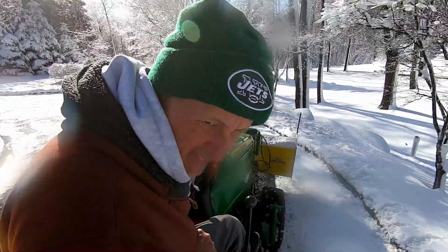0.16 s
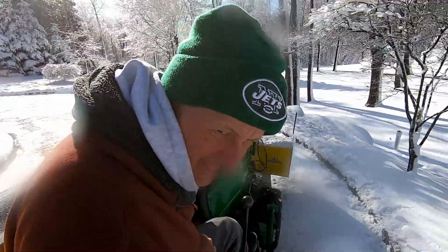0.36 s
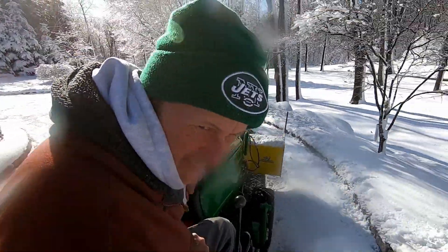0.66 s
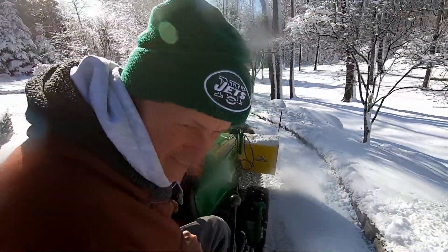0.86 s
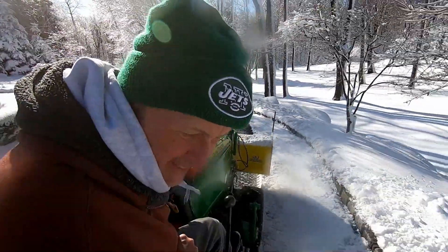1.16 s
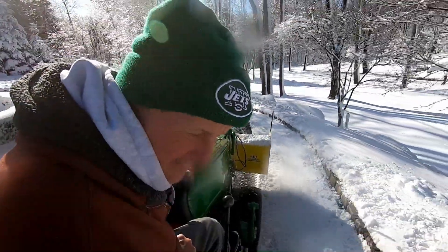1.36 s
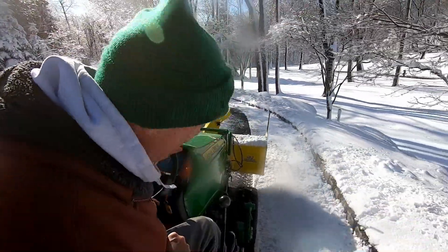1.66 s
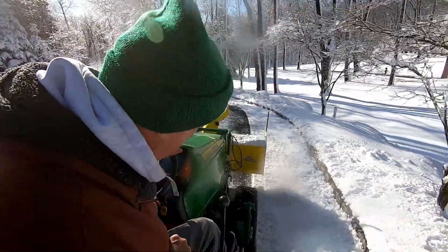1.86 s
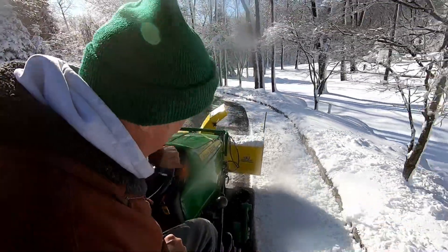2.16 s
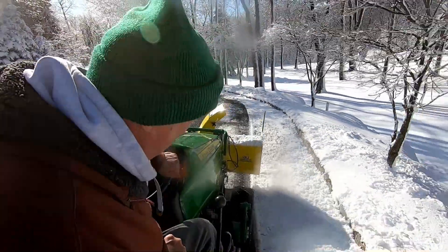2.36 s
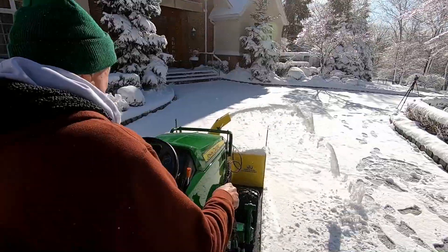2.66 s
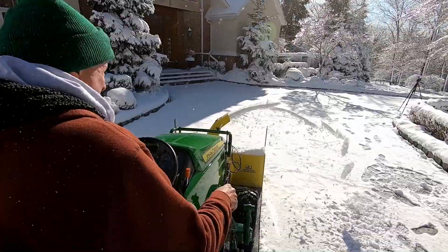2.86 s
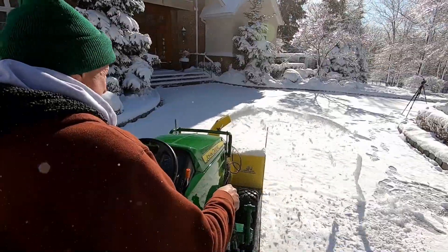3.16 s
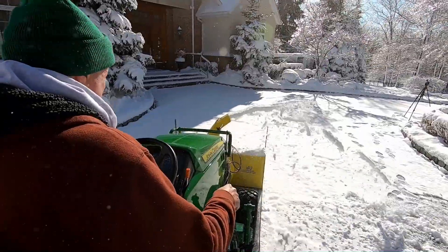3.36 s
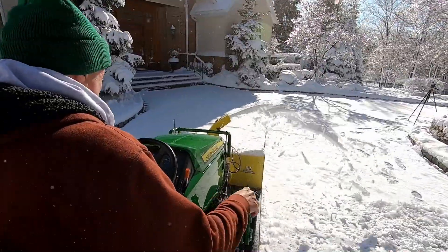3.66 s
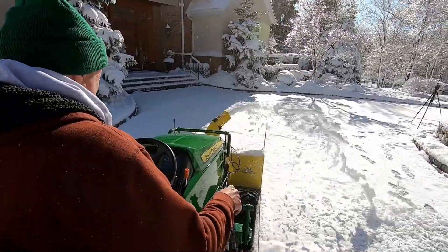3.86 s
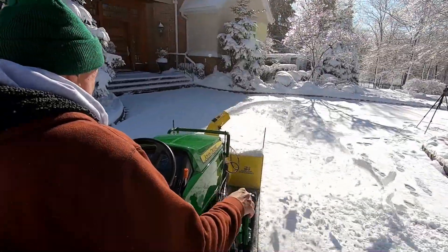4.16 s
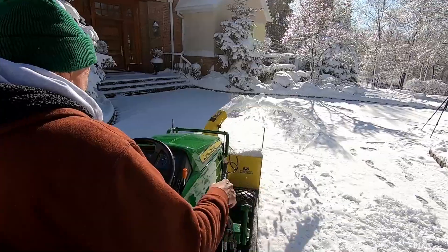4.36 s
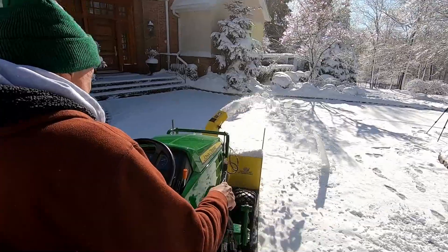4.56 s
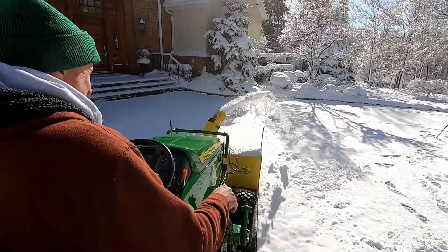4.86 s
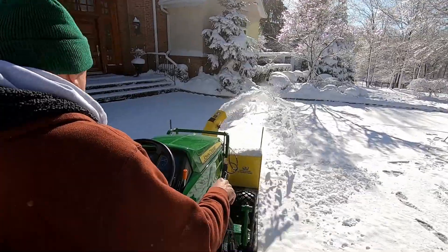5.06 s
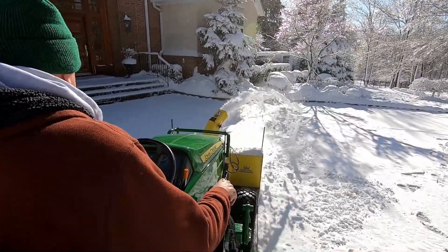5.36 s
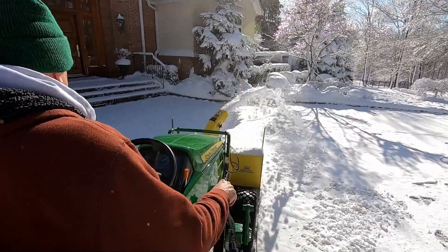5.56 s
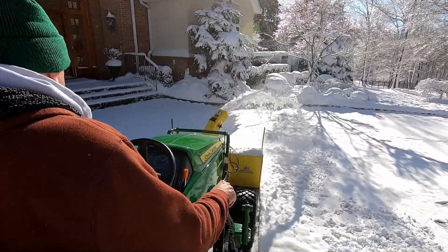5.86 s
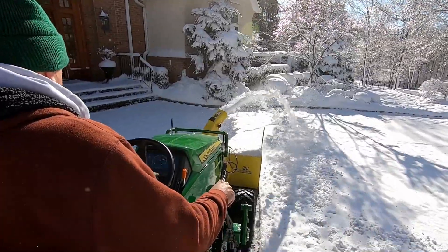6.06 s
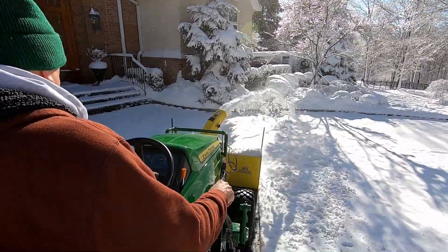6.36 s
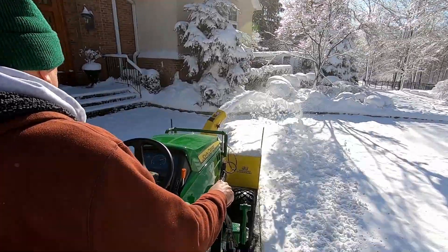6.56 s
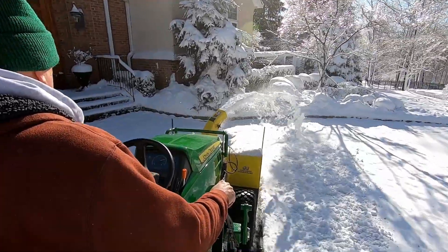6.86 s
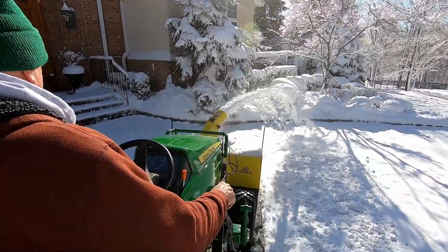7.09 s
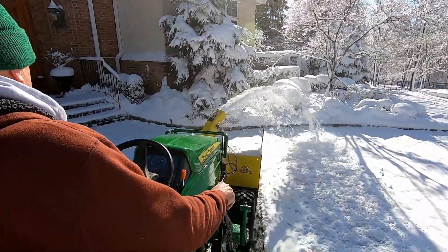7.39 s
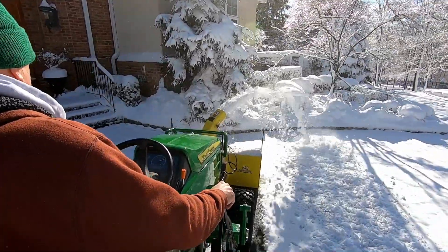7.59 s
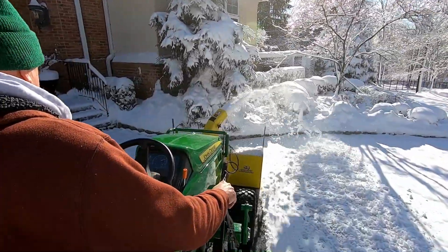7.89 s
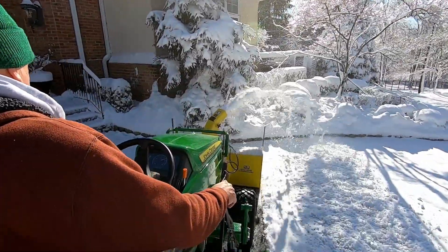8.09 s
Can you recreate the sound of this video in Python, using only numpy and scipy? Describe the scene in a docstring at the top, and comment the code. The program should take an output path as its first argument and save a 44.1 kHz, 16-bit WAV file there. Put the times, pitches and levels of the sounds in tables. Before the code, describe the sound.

A small diesel tractor drones steadily outdoors, gears whining and panels clattering, as its front snow thrower churns light snow and the load abruptly deepens.

```python
"""Tractor with a front snow thrower

A three-cylinder diesel at governed speed: its exhaust drones, its gears whine, and clatter rings hood and housing.
Tones are cosines locked to the crankshaft angle; churning snow, spray, rumble and wind are filtered noise.
At 2.47 s a light pass along the drive's edge jumps to a full pass, where loaded gears warble and snow sprays.
Snow is heaviest near 3.9 s; from 6 s the tractor slows, the thrower empties and the engine runs up."""
import sys
import numpy as np
from scipy.fft import rfft, irfft, next_fast_len
from scipy.io import wavfile
from scipy.ndimage import map_coordinates

SR = 44100
rng = np.random.default_rng(int(sys.argv[2]) if len(sys.argv) > 2 else 0)


def generate_wav(sig):
    """Save sig (samples, or channels by samples) to the path in sys.argv[1] as 16-bit PCM at SR."""
    pcm = np.round(np.clip(np.atleast_2d(sig).T, -1, 1) * 32767).astype(np.int16)
    wavfile.write(sys.argv[1], SR, pcm)


N = 362938
T = np.arange(N) / SR  # time [s]

JUMP_S = 2.47  # the light pass gives way to the full pass
GOVERNED = 46.55  # governed engine speed [crank turns/s]
UNLOAD_S, UNLOADING_S = 6.77, 0.88  # the thrower loses its load: start, length [s]


def amp(db):
    """Decibels to gain."""
    return 10 ** (np.asarray(db) / 20)


def unit(x):
    """Normalise to an rms of 1."""
    return x / np.sqrt(np.mean(x ** 2) + 1e-20)


def curves(rows):
    """Piecewise linear interpolation: one curve for each column after the time."""
    s, *columns = np.transpose(rows)
    return [np.interp(T, s, column) for column in columns]


def bumps(rows):
    """Sum of Gaussian swells, from rows of (peak [s], half width [s], height)."""
    return sum(height * np.exp(-((T - s) / width) ** 2) for s, width, height in rows)


def ramp(start, length):
    """A raised-cosine step from 0 to 1."""
    progress = np.clip((T - start) / length, 0, 1)
    return .5 - .5 * np.cos(np.pi * progress)


def wobble(rate):
    """Slow random modulation: a smooth curve through random knots, rate of them a second."""
    knots = rng.standard_normal(int(N * rate / SR) + 4)
    return map_coordinates(knots, [T * rate])


def by_pass(light, full):
    """A 10 ms crossfade at the jump, from the light pass's value to the full pass's."""
    return light + (full - light) * np.clip((T - JUMP_S) * 100 + .5, 0, 1)


def filtered(x, response):
    """Linear filtering: the spectrum of x times a response of frequency [Hz]."""
    m = next_fast_len(N + 8192)
    return irfft(rfft(x, m) * response(np.fft.rfftfreq(m, 1 / SR)), m)[..., :N]


def white():
    """White noise with a flat spectral density of 0 dB per Hz."""
    return rng.standard_normal(N) * np.sqrt(SR / 2)


def coloured(x, points, peaks=()):
    """Spectral shaping through (frequency [Hz], gain [dB]) points, lifted at the resonances."""
    f, db = np.transpose(points)

    def response(hz):
        envelope_db = np.interp(np.log(hz + 1), np.log(f), db, right=-150)
        lift_db = sum(height / (1 + (2 * (hz - centre) / width) ** 2) for centre, width, height in peaks)
        return amp(envelope_db + lift_db)

    return filtered(x, response)


def two_colours(x, rows, peaks=()):
    """Spectral shaping of x by the envelope of the pass under way."""
    hz, light_db, full_db = np.transpose(rows)
    light = coloured(x, np.c_[hz, light_db], peaks)
    full = coloured(x, np.c_[hz, full_db], peaks)
    return by_pass(light, full)


def tone(cycles, slip, flutter_db, rate):
    """Phase and amplitude modulation of a line of rms 1; slip scales the phase wander [rad]."""
    level = amp(flutter_db * wobble(rate))
    return unit(level * np.cos(2 * np.pi * cycles + slip * wobble(rate)))


def cyclic(turns, share, size=4096):
    """Noise of 0 dB per Hz; the share that repeats every two crank turns forms a weak line spectrum."""
    k, count = np.arange(size // 2 + 1), size // 32
    between = (k < count) & (k % 3 > 0) & (k % 14 > 0)  # the strong orders are left out
    cycle = unit(irfft(between * np.exp(2j * np.pi * rng.random(len(k)))))
    bandwidth = count * turns[-1] / 2 / T[-1]  # Hz
    repeating = np.interp(turns / 2, np.arange(size) / size, cycle, period=1) * np.sqrt(bandwidth)
    share = np.clip(share, 0, 1)
    return np.sqrt(share) * repeating + np.sqrt(1 - share) * white()


def exhaust(turns):
    """Periodic firing, three in two turns, gives harmonics; unequal cylinders add unsteady lines in between."""
    # exhaust lines relative to the drone: (order [cycles per two crank turns], light pass [dB], full pass [dB])
    exhaust_lines = [(2, -20.5, -19), (3, 0, 0), (4, -18, -14.3), (6, -15, -9.3), (9, -17.5, -14.5),
                     (12, -19, -21)]
    throb_per_order = .3  # dB per order above the second: uneven firing makes higher lines throb more
    drone = np.zeros(N)
    for k, light_db, full_db in exhaust_lines:
        k = round(k)
        slip = .025 * k if k % 3 == 0 else 1  # phase wander [rad]: firing harmonics hold steadier
        throb = amp(throb_per_order * max(k - 2, 0) * wobble(18))
        line = unit(throb * np.cos(np.pi * k * turns + slip * wobble(14)))
        drone -= by_pass(amp(light_db), amp(full_db)) * line
    return drone


def rumble(turns):
    """Amplitude modulation at the firing rate: gas and chassis noise swells with every firing."""
    # engine and chassis noise before the snow load: (frequency [Hz], light pass [dB per Hz], full pass [dB per Hz])
    rumble_colour = [(15, -69, -69.5), (55, -52.5, -52), (99, -57.5, -46.5), (166, -56, -48.5),
                     (195, -55, -48.5), (257, -57.5, -54), (320, -52.5, -53), (388, -48.5, -50.5),
                     (449, -62, -60.5), (700, -64.5, -61.5), (1080, -78.5, -76), (2000, -110, -110)]
    puffs = unit(1 + .28 * np.cos(3 * np.pi * turns))
    return two_colours(cyclic(turns, share=.15) * puffs, rumble_colour) * amp(.7 * wobble(9))


def gears(turns):
    """Tooth meshing gives lines in step with the crank; load twists the train and backlash rings the case."""
    # gear and valve lines relative to the whine:
    # (order [cycles per two crank turns, rounded for pitch], light pass [dB], full pass [dB])
    mesh_lines = [(14, -12.5, -14.5), (26, -19, -24.5), (32, -24.5, -26.5), (33, -20.5, -19.5),
                  (42, -17.5, -23), (48, -29.5, -32.5), (54, -28.5, -7), (56, -0.5, -5.5), (72.3, -21, -39),
                  (120.5, -22, -34), (168.7, -23.5, -41)]
    # case ringing around the tooth rate, relative to the whine:
    # (frequency [Hz], light pass [dB per Hz], full pass [dB per Hz])
    case_colour = [(1000, -79.5, -79), (1157, -50, -44.5), (1210, -32.5, -34), (1290, -32, -31),
                   (1370, -29, -32), (1400, -34.5, -38.5), (1700, -67.5, -69)]
    twist = by_pass(.0003, .0033) * wobble(24)  # crank turns
    backlash = by_pass(.003, .005)  # radians per order
    lines = np.zeros(N)
    for k, light_db, full_db in mesh_lines:
        cycles = round(k) * (turns + twist) / 2
        line = tone(cycles, backlash * k, flutter_db=by_pass(0.8, 1.1), rate=50)
        lines += by_pass(amp(light_db), amp(full_db)) * line
    once_per_turn = amp(0.43 * np.cos(2 * np.pi * turns))
    return lines + two_colours(white() * once_per_turn, case_colour)


def fan(turns, racing_db):
    """Beating: two close blade lines pulse nearly seven times a second; the hum swells early in the light pass."""
    # blade lines of the belt-driven fans: (order [cycles per crank turn], level relative to the hum [dB])
    blade_lines = [(7.513, -2.2), (7.657, -4.3), (7.97, -14.5)]
    # spells of the hum in the full pass: (peak [s], half width [s], lift [dB])
    hum_spells = [(3.2, .7, -3), (4.55, .2, 3.5), (5.75, .3, 4)]
    hum_db = (-24, -34)  # light, full pass, before the swells below
    throb_s = 1.0  # the blade lines fall into step, making the strongest throb
    swell_s, rise_s, rise_db = 0.4, 0.42, 10
    fade_per_s = 1.3  # dB per s, after the swell
    since = turns - np.interp(throb_s, T, turns)
    blades = sum(amp(db) * tone(k * since, slip=by_pass(.1, .25), flutter_db=.7, rate=26)
                 for k, db in blade_lines)
    fade_db = by_pass(fade_per_s * np.maximum(T - throb_s, 0), 0)
    before_swell_db = rise_db * (1 - ramp(swell_s, rise_s))
    return blades * amp(by_pass(*hum_db) + racing_db + bumps(hum_spells) - fade_db - before_swell_db)


def clatter(turns):
    """Impact excitation of resonances: each firing knocks the block at a new strength and rings the panels."""
    # clatter relative to its level: (frequency [Hz], light pass [dB per Hz], full pass [dB per Hz])
    clatter_colour = [(400, -63, -56.5), (860, -30.5, -33.5), (1150, -34, -30.5), (1505, -27.5, -25.5),
                      (1637, -31.5, -32), (2020, -38.5, -35.5), (2600, -34.5, -34.5), (3100, -37, -37),
                      (3720, -39.5, -39), (4154, -38.5, -38), (4690, -58, -51), (7000, -64, -54),
                      (12000, -83, -99.5)]
    # hood and housing resonances: (frequency [Hz], width [Hz], lift [dB])
    panel_modes = [(1873, 185, 12), (2096, 76, 4.5), (2200, 53, 4.5), (2870, 170, 4.5), (3350, 172, 7),
                   (3926, 130, 5)]
    firing = 3 * turns / 2
    count = firing.astype(int)
    strength = amp(3.8 * rng.standard_normal(1000))[count]
    raps = unit(1 + 0.41 * strength * np.exp(-(firing % 1) / 1.5))
    knocking = cyclic(turns, share=.15, size=8192) * raps * amp(0.59 * wobble(12))
    return two_colours(knocking, clatter_colour, panel_modes)


def shaft(turns, load_db):
    """Load-dependent gear mesh: fourteen teeth a turn sing while snow loads them and sag when the belt slips."""
    # clumps of snow make the belt slip: (peak [s], half width [s], share of speed lost [1])
    belt_slips = [(3.92, .1, .016), (4.41, .09, .009)]
    shaft_db = (-44, -30.4)  # light, full pass, at the usual feed
    per_feed, unload_db = 0.38, 16  # dB per dB of extra feed; drop once unloaded
    shaft_turns = turns - GOVERNED * np.cumsum(bumps(belt_slips)) / SR
    db = by_pass(*shaft_db) + per_feed * load_db - unload_db * ramp(UNLOAD_S, UNLOADING_S)
    return amp(db) * tone(14 * shaft_turns, slip=.14, flutter_db=1.1, rate=16)


def pulleys(turns):
    """Belt coupling: the alternator swells as the thrower empties; slacker belts creep, so their lines wander."""
    # other belt-driven lines, at governed speed: (order [cycles per crank turn], light pass [dB], full pass [dB])
    belt_lines = [(25.68, -47.5, -39.5), (32.6, -44, -55), (38.83, -34.5, -50), (85.2, -49, -52)]
    order, alternator_db = 15.28, (-37, -38.5)  # cycles per crank turn; light, full pass before unloading
    unmasked_db = 1.5  # the alternator's rise once the thrower is unloaded
    light_db, full_db = alternator_db
    alternator = by_pass(amp(light_db), amp(full_db)) * tone(order * turns, slip=.35, flutter_db=2, rate=12)
    alternator *= amp(unmasked_db * ramp(UNLOAD_S, UNLOADING_S))
    belts = sum(by_pass(amp(light), amp(full)) * tone(k * turns, slip=0.017 * k, flutter_db=1.5, rate=16)
                for k, light, full in belt_lines)
    return alternator + belts


def drive():
    """Pitch follows shaft speed: the hydrostatic drive's thin whine sinks as the tractor slows and brakes."""
    # lines of the drive, relative to its level: (multiple of the shaft rate [1], level before slowing [dB])
    drive_lines = [(8.42, -10), (21, 0), (22, -7)]
    travel_hz, slow_hz = 65.3, 62.2  # shaft rate at full travel, when slowed
    drive_db, braking_peak_db = (-47, -35.5), 8  # light, full pass; lift of the main line at its loudest
    slowed = ramp(6.05, 1.3)  # start, length [s]
    cycles = np.cumsum(travel_hz + (slow_hz - travel_hz) * slowed + .18 * wobble(2.5)) / SR
    braking_db = braking_peak_db * np.sin(np.pi * slowed ** 1.5)
    lines = np.zeros(N)
    for k, db in drive_lines:
        gain = amp(braking_db) if k == 21 else 1 - slowed  # only the main line outlasts the slowing
        lines += amp(db) * gain * tone(k * cycles, slip=.3, flutter_db=1.8, rate=12)
    return amp(by_pass(*drive_db)) * lines


def warble(hz, swing, light_db, full_db):
    """Random frequency modulation: an unbroken line whose pitch and strength swing."""
    cycles = np.cumsum(hz * (1 + swing * wobble(30))) / SR  # 30 pitch knots a second
    line = tone(cycles, slip=.2, flutter_db=1.6, rate=60)
    return amp(by_pass(light_db, full_db)) * line * amp(1.1 * wobble(9) - .2)


def impeller_gear():
    """Load modulation: uneven snow brakes the impeller, so its gear, chain and bearings warble."""
    # warbling lines, levels before they waver:
    # (frequency [Hz], pitch swing [share], light pass [dB], full pass [dB])
    warbling_lines = [(1288, .03, -43, -33.5), (2068, .012, -52, -46), (2890, .015, -45, -45),
                      (3405, .009, -48, -46.5), (3962, .004, -42.5, -46)]
    # the chain sings out in spells as its tension changes: (peak [s], half width [s], lift [dB])
    chain_spells = [(2.85, .15, 3), (4.95, .17, 5.5), (5.43, .13, 5), (6.9, .08, 4), (7.8, .1, 3)]
    chain = warble(1868, .013, light_db=-45, full_db=-38.3)
    return sum(warble(*row) for row in warbling_lines) + amp(bumps(chain_spells)) * chain


def churn(turns, feed_db):
    """Noise excitation of a cavity: snow churning in the housing rings its drum note, louder with the feed."""
    # churning snow, relative to the churn level: (frequency [Hz], density [dB per Hz])
    churn_colour = [(300, -62.5), (490, -23), (560, -26), (690, -22), (770, -26.5), (850, -42.5),
                    (1100, -42.5), (1600, -70.5)]
    # the housing's drum note: (frequency [Hz], width [Hz], lift [dB])
    drum_mode = [(551, 14, 7)]
    return coloured(cyclic(turns, share=0.063), churn_colour, drum_mode) * amp(feed_db + 1.1 * wobble(10))


def spray():
    """Turbulence and random impacts: snow hisses from the chute with icy crumbs, more in the full pass."""
    # snow spray, relative to the hiss: (frequency [Hz], density [dB per Hz])
    spray_colour = [(3000, -64.5), (4700, -32.5), (5400, -41.5), (6700, -37.5), (8000, -41.5),
                    (9000, -48.5), (10400, -66), (12000, -80)]
    # icy crumbs, relative to the hiss: (frequency [Hz], density [dB per Hz])
    crumb_colour = [(2500, -60), (5000, -48), (8000, -55), (9500, -63), (11500, -72)]
    crumbs_per_s = by_pass(50, 70)
    crumbs = (rng.random(N) < crumbs_per_s / SR) * rng.uniform(-1, 1, N)
    flow = white() * amp(.9 * wobble(22))
    return coloured(flow, spray_colour) + coloured(unit(crumbs) * np.sqrt(SR / 2), crumb_colour)


def knocks():
    """Heavily damped impacts: the chassis thumps over lumps of snow in bursts that die without ringing."""
    # dull thumps: (onset [s], envelope level before its rise and decay [dB])
    thumps = [(0.695, -15.5), (4.085, -16)]
    # their colour, relative to the thump: (frequency [Hz], density [dB per Hz])
    thud_colour = [(50, -46), (110, -23), (190, -22.5), (300, -33), (700, -47), (3000, -61), (8000, -94)]
    rise_s, t60_s = 0.0089, 0.15  # rise time constant, time to decay by 60 dB
    level = np.zeros(N)
    for s, db in thumps:
        age = np.maximum(T - s, 0)
        level += (1 - np.exp(-age / rise_s)) * amp(db - 60 * age / t60_s)
    return coloured(white() * level, thud_colour)


def wind():
    """Turbulent pressure: a light breeze buffets the microphone in the deep bass and swells in gusts."""
    # gusts: (peak [s], half width [s], lift [dB])
    gusts = [(0.299, 2, 11.3), (8.1, 1.1, 8.5)]
    breeze_db = -51.5  # gain of the buffeting between gusts
    # (frequency [Hz], density before that gain [dB per Hz])
    buffet = coloured(white(), [(5, -22.0), (16, -7.0), (26, -3.0), (45, -5.5), (90, -6.0), (250, -34.5)])
    return buffet * amp(breeze_db + bumps(gusts) + 1.1 * wobble(2.9))


def microphone(x):
    """Coherence of two close ports: nearly alike, with a rightward lean and scatter off the machine in the treble."""
    # ports: (frequency [Hz], left minus right [dB], scattered share [dB])
    ports = [(30, 0, -39), (150, 0, -48), (300, 0, -41), (600, -.3, -30), (1300, -1, -30),
             (2000, -1.3, -27), (4000, -1.1, -18.5), (8000, 0, -14)]
    hz, balance_db, scatter_db = np.transpose(ports)

    def along(f, values):
        return np.interp(np.log(f + 1), np.log(hz), values)

    echoes = rng.standard_normal(N) * np.exp(-T / .03)
    echo_phase = np.angle(rfft(echoes, next_fast_len(N + 8192)))
    scattered = filtered(x, lambda f: amp(along(f, scatter_db)) * np.exp(1j * echo_phase))
    # the scattered part has opposite sign at the two ports
    return np.array([filtered(x, lambda f: amp(side * along(f, balance_db) / 2)) + side * scattered
                     for side in (1, -1)])


def scene():
    """Superposition: the crankshaft times the engine sounds, the snow feed loads the thrower, wind adds noise."""
    # engine speed before hunting; clumps of snow pull it down near 3.9 and 4.4 s, and it runs up
    # as the tractor slows: (time [s], speed [crank turns/s])
    crank_speed = [(0.0, 46.42), (0.42, 46.6), (0.66, 46.3), (0.95, 46.54), (1.65, 46.6), (2.1, 46.46),
                   (2.55, 46.65), (2.9, 46.42), (3.3, 46.6), (3.73, 46.58), (3.93, 46.08), (4.18, 46.38),
                   (4.43, 46.22), (4.7, 46.5), (5.1, 46.5), (5.8, 46.29), (6.4, 46.5), (7.25, 46.52),
                   (7.78, 47.03), (8.23, 46.62)]
    # snow fed into the thrower, as its churning: (time [s], level [dB])
    snow_feed = [(0.1, -36), (1.39, -35), (3.0, -32.5), (3.3, -30), (3.6, -31.5), (3.93, -28), (4.35, -31),
                 (6.0, -33), (7.0, -35.5), (8.1, -36.5)]
    # levels of (light pass, full pass) [dB], before load, racing and wavering
    drone_db, whine_db, clatter_db, hiss_db = (-19.9, -17.3), (-22, -23), (-32, -33.5), (-46.5, -51)
    usual_feed_db = -32
    # dB per dB of extra feed: the rumble grows in the full pass, the gear whine is damped
    rumble_per_feed, whine_per_feed = 0.26, -0.21

    hunting = .05 * np.sin(2 * np.pi * 1.98 * T)  # the governor hunts [turns/s], 1.98 swings a second
    speed = curves(crank_speed)[0] + hunting
    turns = np.cumsum(speed) / SR
    racing_db = 5 * np.maximum(speed - GOVERNED, 0)  # above governed speed, 5 dB per extra turn/s
    feed_db, = curves(snow_feed)
    load_db = feed_db - usual_feed_db

    drone = amp(by_pass(*drone_db) + 0.17 * wobble(4.3)) * exhaust(turns)
    body = amp(by_pass(0, rumble_per_feed) * load_db) * rumble(turns)
    rattle = amp(by_pass(*clatter_db) + racing_db) * clatter(turns)
    engine = drone + body + fan(turns, racing_db) + rattle

    gear_whine = amp(by_pass(*whine_db) + whine_per_feed * load_db + 0.43 * wobble(3)) * gears(turns)
    belts = amp(racing_db) * pulleys(turns)
    whine = gear_whine + shaft(turns, load_db) + belts + drive() + impeller_gear()

    snow = churn(turns, feed_db) + amp(by_pass(*hiss_db) + racing_db) * spray()
    return microphone(engine + whine + snow + knocks() + wind())


def record(dry):
    """Band limitation: an ideal low-pass removes everything from 11.5 kHz up."""
    return filtered(dry, lambda hz: hz < 11500)


dry = scene()
out = record(dry)
generate_wav(out)
```